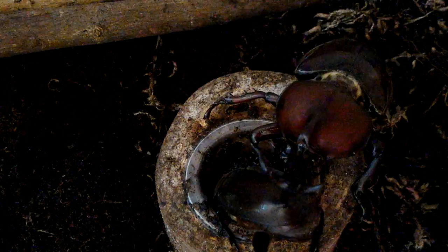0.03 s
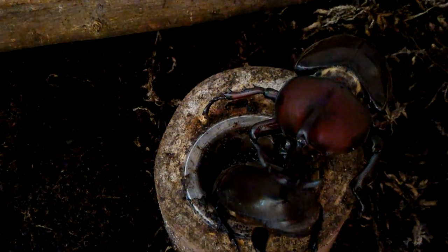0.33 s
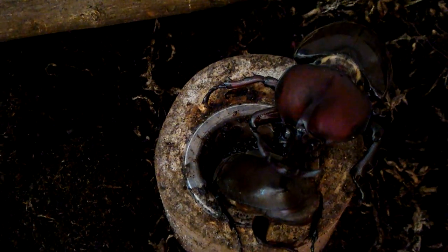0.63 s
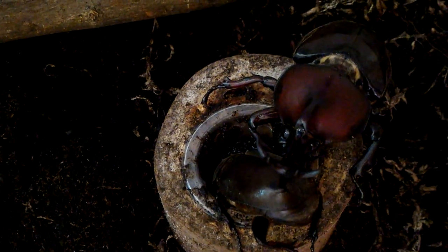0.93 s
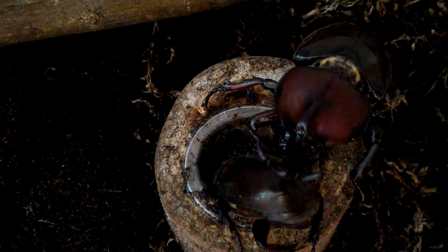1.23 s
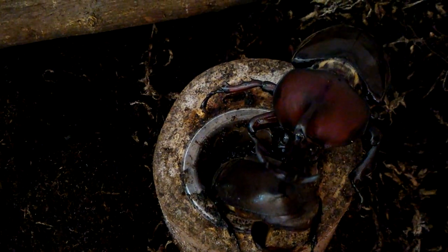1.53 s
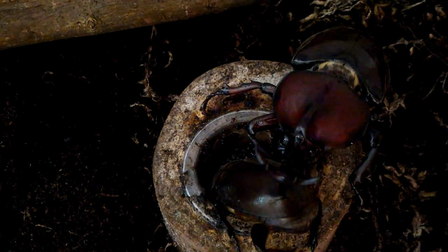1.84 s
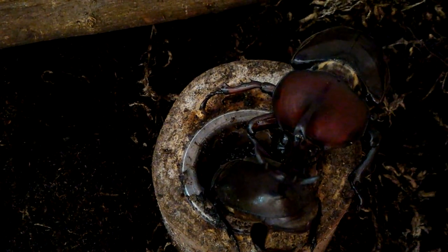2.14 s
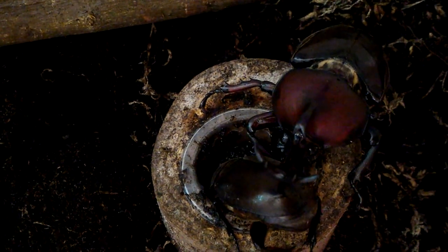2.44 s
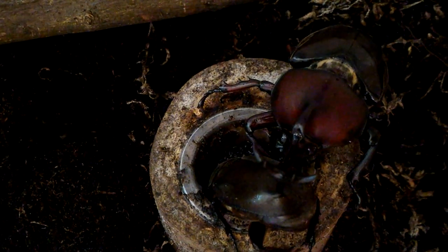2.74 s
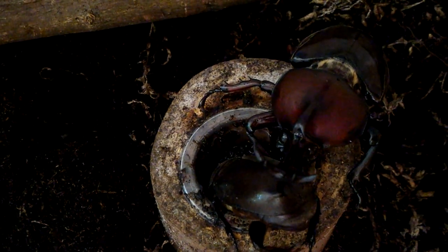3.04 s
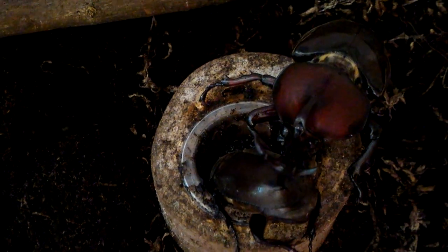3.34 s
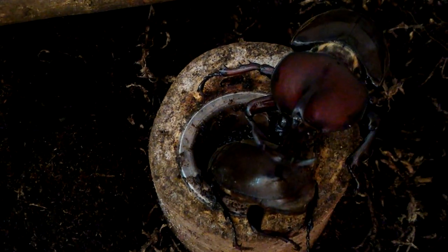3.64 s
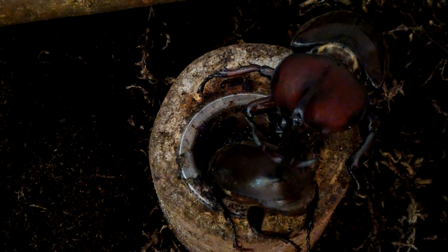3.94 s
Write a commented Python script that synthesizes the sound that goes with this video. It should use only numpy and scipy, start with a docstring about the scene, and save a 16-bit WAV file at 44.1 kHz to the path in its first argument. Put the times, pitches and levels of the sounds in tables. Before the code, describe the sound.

Steady low hum and soft hiss from an appliance fill a quiet room after a quick fade-in. Faint, high wet clicks come unevenly from beetles eating in a small enclosure near the microphone, busiest midway through.

```python
"""A quiet room, the microphone close to a small enclosure where beetles feed.
An appliance hums behind them: mains buzz, a motor turning just below the mains rate, and the hiss
of its air. The feeding makes tiny wet ticks that fall in pitch and reflect off the enclosure walls.
The sound fades in at the start."""
import sys
import numpy as np
from scipy import signal
from scipy.fft import rfft, irfft
from scipy.io import wavfile

SR = 44100
rng = np.random.default_rng(int(sys.argv[2]) if len(sys.argv) > 2 else 0)


def log_audio(samples):
    """Write samples as a 16-bit WAV file to the path given in sys.argv[1]."""
    # one column per channel
    frames = np.atleast_2d(samples).T
    # limit to full scale, then quantise
    limited = np.clip(frames, -1, 1)
    pcm = np.round(limited * 32767).astype(np.int16)
    wavfile.write(sys.argv[1], SR, pcm)


N = 176400

# The mains buzz. Each row: multiple of the mains rate, level in dB.
MAINS_HARMONICS = [(1, -64), (2, -56), (3, -52), (4, -75), (5, -71), (6, -78), (7, -71), (9, -81),
                   (10, -78), (12, -77), (13, -67), (14, -73), (15, -79), (16, -73), (17, -87), (18, -82),
                   (19, -84), (20, -82), (21, -82), (22, -85), (23, -87)]
# The motor's tones. Each row: multiple of the shaft rate, level in dB.
MOTOR_ORDERS = [(1, -52.5), (2, -66.5), (4, -74), (5, -85), (10, -84), (11, -77.5), (12, -103.5), (23, -81),
                (24, -79.5), (39, -83.5), (41, -89), (48, -83.5), (52, -74)]
# Other low tones in the room. Each row: frequency in Hz, level in dB.
LOW_DRONES = [(24.8, -69.5), (50.8, -76), (103.3, -73.5), (110.1, -69), (140.7, -71), (303.8, -77.5)]
# The spectrum of the moving air. Each row: frequency in Hz, relative density in dB.
AIR_SPECTRUM = [(10, -20), (22, -0.5), (50, 1.5), (90, -5), (125, -2), (155, -5.5), (195, 2), (220, -13.5),
                (285, -9), (325, -20), (400, -11.5), (450, -16), (500, -21.5), (680, -19.5), (760, -12.5),
                (920, -13), (1020, -22), (1370, -19.5), (1580, -25.5), (2100, -21), (2600, -16.5),
                (2950, -15), (3200, -18), (3330, -16), (3800, -21), (4350, -21), (4650, -20), (5500, -18.5),
                (6200, -24), (7500, -28.5), (8700, -32), (10000, -36.5), (14000, -42.5), (15600, -44)]
# The wet ticks of feeding. Each row: start in seconds, settled pitch in Hz, ring peak in dB,
# swell in seconds, decay in seconds, level of the noisy snap in dB.
FEEDING_TICKS = [ (.4705, 12000, -68, .0005, .0015, -66), (.531, 2500, -53, 0.0022, .004, -66),
                 (.718, 3420, -48.5, 0.0027, .003, -54), (.836, 5370, -55, 0.0018, .003, -70),
                 (1.223, 5850, -49.5, 0.0011, 0.0022, -65), (1.2402, 4660, -39.5, 0.0029, 0.0028, -62),
                 (1.266, 5450, -49.5, .002, .0025, -63), (1.3118, 13200, -63, .0005, .0015, -64),
                 (1.3725, 4570, -38, .0028, 0.0014, -57), (1.431, 6300, -60, .001, 0.0024, -70),
                 (1.691, 5850, -51.5, 0.0012, 0.003, -60), (1.716, 2610, -42, 0.0033, 0.0048, -66),
                 (1.739, 4160, -45, .002, 0.0018, -57), (1.946, 11000, -65, .0005, .002, -67),
                 (2.0295, 5140, -45, 0.0023, .0035, -58), (2.265, 5280, -47.5, 0.0024, 0.0024, -58),
                 (2.3262, 10030, -60, .0006, 0.0016, -66), (2.404, 8700, -57, 0.00076, 0.0011, -66),
                 (2.552, 5200, -50.5, 0.0022, .003, -68), (2.555, 7100, -59, 0.0012, 0.0017, -66),
                 (2.7125, 8250, -57.5, 0.00076, .0025, -63), (3.222, 5900, -54, .001, .0018, -66),
                 (3.5708, 9800, -65, .0005, .0015, -69), (3.607, 3300, -50, 0.0029, 0.0023, -62), ]


def amp(db):
    """Decibels to gain."""
    return 10 ** (np.asarray(db) / 20)


def unit_rms(x):
    """Scales to rms 1."""
    return x / np.sqrt(np.mean(x ** 2) + 1e-20)


def add(mix, start_s, sound):
    """Mixes a sound in at a time."""
    part = mix[max(round(start_s * SR), 0):][:len(sound)]
    part += sound[:len(part)]


def drift(rate_hz):
    """Random wander of rms 1, mostly slower than the given rate."""
    hz = np.fft.rfftfreq(N, 1 / SR)
    spectrum = rfft(rng.standard_normal(N)) * (hz > 0)
    return unit_rms(irfft(spectrum / (1 + (hz / rate_hz) ** 4), N))


def tones(rows, base_hz, slip_hz, waver_db, waver_hz):
    """Sines on multiples of one slightly unsteady rate, each wavering in level."""
    turns = np.cumsum(base_hz + slip_hz * drift(1.8)) / SR
    out = np.zeros(N)
    for multiple, db in rows:
        peak = np.sqrt(2) * amp(db + waver_db * drift(waver_hz))
        out += peak * np.sin(2 * np.pi * (multiple * turns + rng.random()))
    return out


def appliance_hum(mains_hz=60.013, shaft_hz=58.703):
    """Steady mains buzz beats against the orders of the motor, over a few low drones."""
    buzz = tones(MAINS_HARMONICS, mains_hz, slip_hz=0.0082, waver_db=0.07, waver_hz=1.4)
    motor = tones(MOTOR_ORDERS, shaft_hz, slip_hz=0.022, waver_db=1.5, waver_hz=2.6)
    drones = tones(LOW_DRONES, base_hz=1, slip_hz=0.0007, waver_db=5.1, waver_hz=3)
    return buzz + motor + drones


def appliance_air(level_db=-54.5, ripple_db=0.9, ripple_hz=25, flutter_db=0.74):
    """Even hiss and rumble of moving air, finely coloured by the resonances of the room."""
    hz = np.fft.rfftfreq(N, 1 / SR)
    row_hz, row_db = np.transpose(AIR_SPECTRUM)
    contour_db = np.interp(np.log(hz + 1), np.log(row_hz + 1), row_db)
    knots = np.arange(0, SR / 2, ripple_hz)
    resonances = np.interp(hz, knots, rng.standard_normal(N)[:len(knots)])
    low_cut = hz / np.hypot(hz, 10)
    colour = amp(contour_db + ripple_db * resonances) * low_cut
    level = amp(level_db + flutter_db * drift(rate_hz=7.1))
    return level * unit_rms(irfft(rfft(rng.standard_normal(N)) * colour, N))


def wet_tick(hz, ring_db, swell_s, decay_s, snap_db, sweep_hz=2200, sweep_s=0.00092):
    """A wet snap whose ring drops quickly to its pitch, swells and dies."""
    t = np.arange(0, .03, 1 / SR)
    pitch = hz + sweep_hz * np.exp(-t / sweep_s)
    envelope = np.minimum(t / swell_s, 1) * np.exp(-np.maximum(t - swell_s, 0) / decay_s)
    ring = envelope * np.sin(2 * np.pi * np.cumsum(pitch) / SR)
    # A brief spray of noise as it breaks, in a band just above the settled pitch.
    band = signal.butter(1, [hz, hz + 2200], "bandpass", fs=SR)
    spray = unit_rms(signal.lfilter(*band, rng.standard_normal(len(t))))
    snap = spray * np.minimum(t / .001, 1) * np.exp(-t / .003)
    return amp(ring_db) * ring + amp(snap_db) * snap


def enclosure(x, tail_db=-14, tail_t60_s=0.088):
    """The direct sound, two reflections off the close walls and a short diffuse tail."""
    t = np.arange(0, .12, 1 / SR)
    response = rng.standard_normal(len(t)) * 1e-3 ** (t / tail_t60_s)
    response *= amp(tail_db) / np.linalg.norm(response)
    for delay_s, db in [(.0039, -8), (.0078, -17)]:
        add(response, delay_s, amp([db]))
    return x + signal.fftconvolve(x, response)[:N]


def beetles():
    """The ticks of feeding in the enclosure, close to the microphone."""
    ticks = np.zeros(N)
    for start_s, *settings in FEEDING_TICKS:
        add(ticks, start_s, wet_tick(*settings))
    return enclosure(ticks)


def scene():
    """Hum, air and beetles at one microphone."""
    return (appliance_hum() + appliance_air() + beetles())[None]


def record(dry, silence_s=0.11, fade_s=0.28, floor=0.03, cutoff_hz=15700):
    """The microphone's signal fades in from silence, with the highest treble cut off."""
    t = np.arange(N) / SR - silence_s
    opening = np.clip(t / .005, 0, 1)
    rise = np.clip(t / fade_s, 0, 1) ** 1.05
    fade = opening * (floor + (1 - floor) * rise)
    lowpass = signal.firwin(511, cutoff_hz, window=("kaiser", 9), fs=SR)
    return signal.oaconvolve(dry * fade, lowpass[None], "same")


dry = scene()
out = record(dry)
log_audio(out)
```